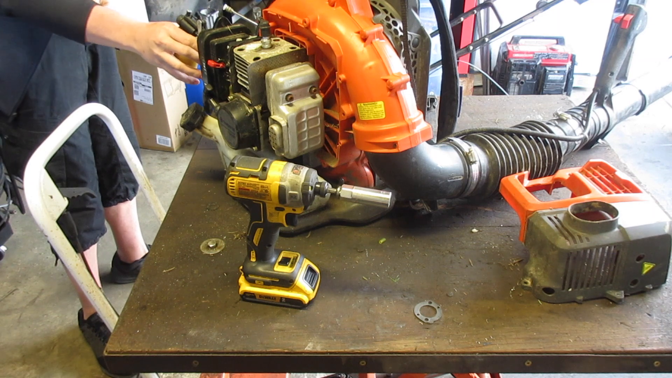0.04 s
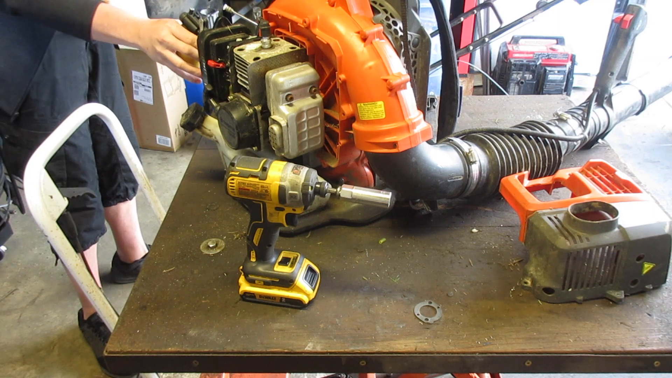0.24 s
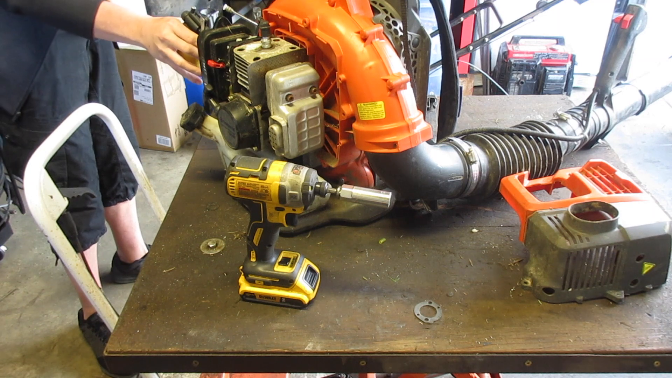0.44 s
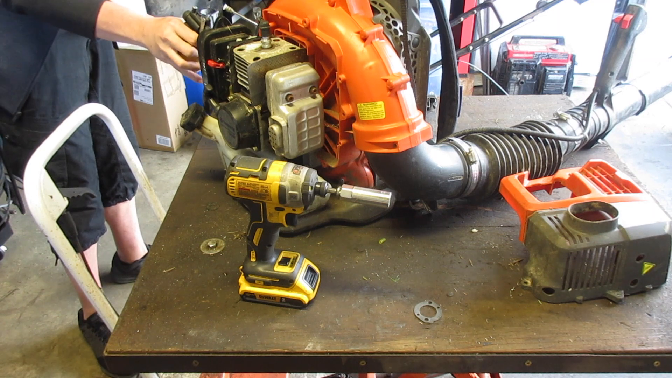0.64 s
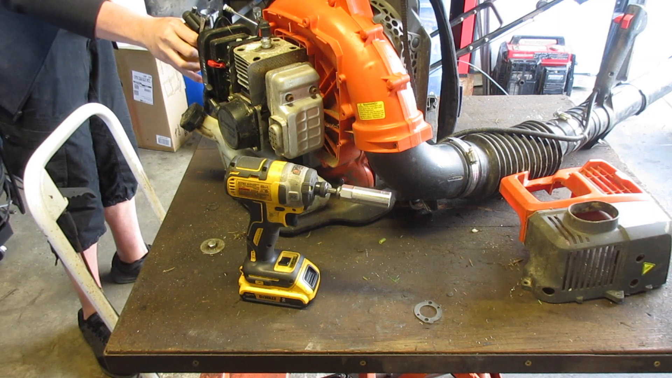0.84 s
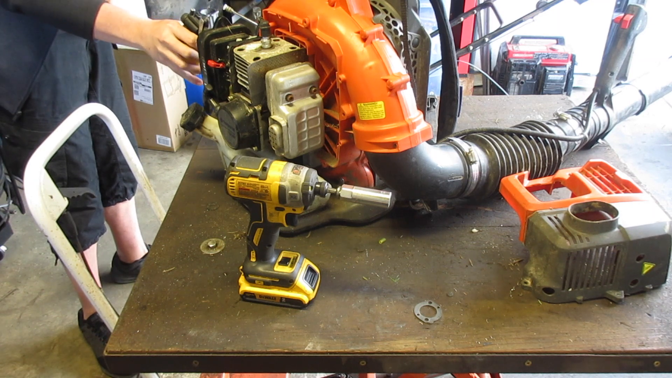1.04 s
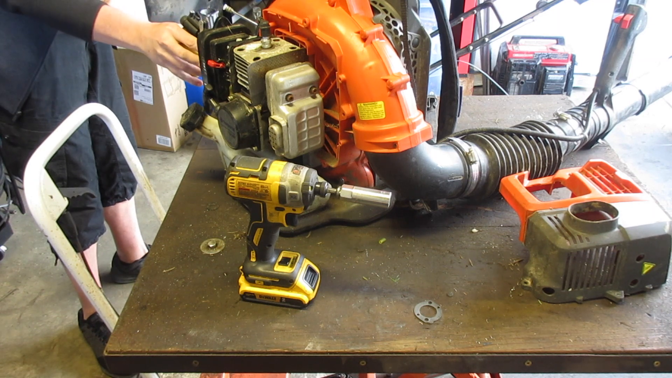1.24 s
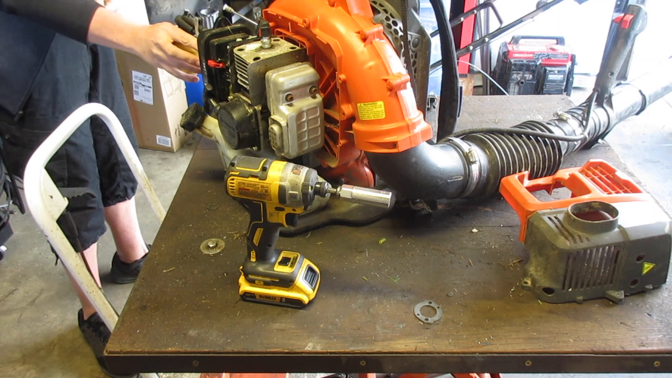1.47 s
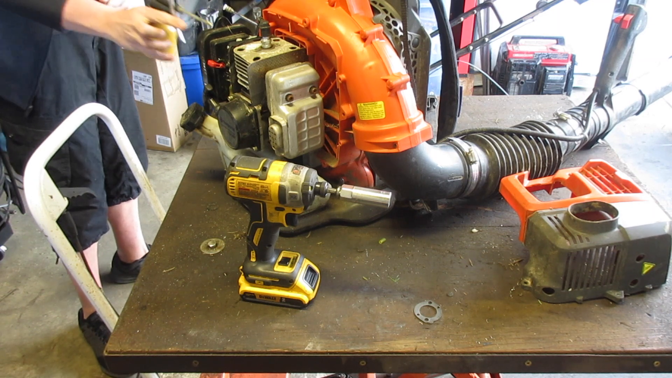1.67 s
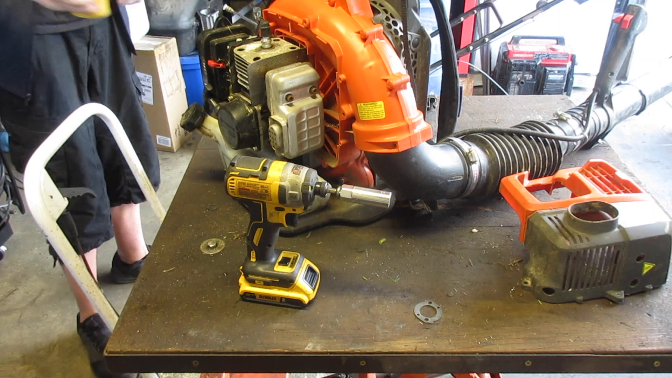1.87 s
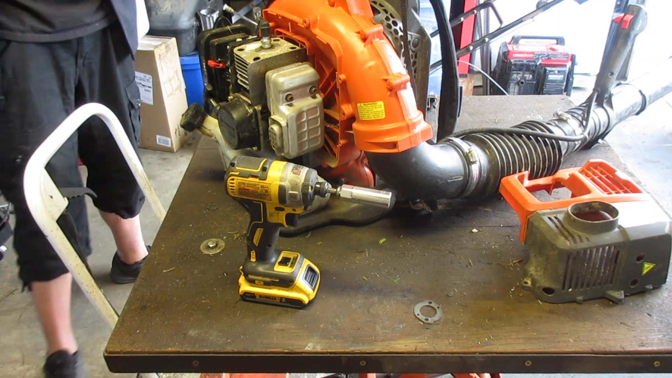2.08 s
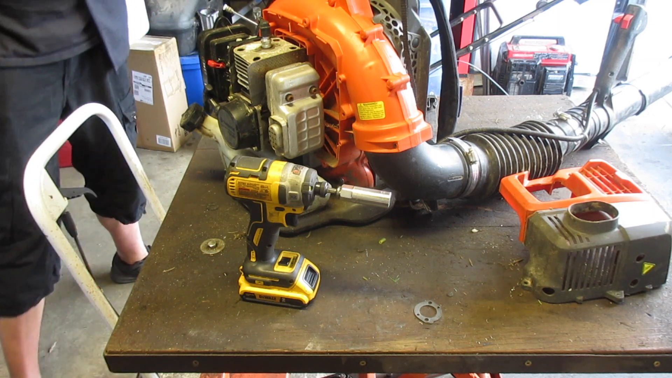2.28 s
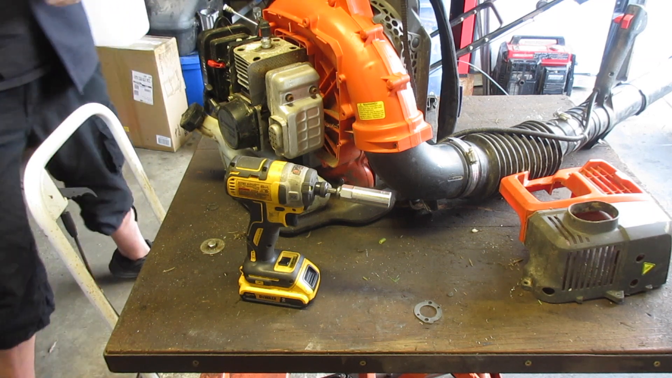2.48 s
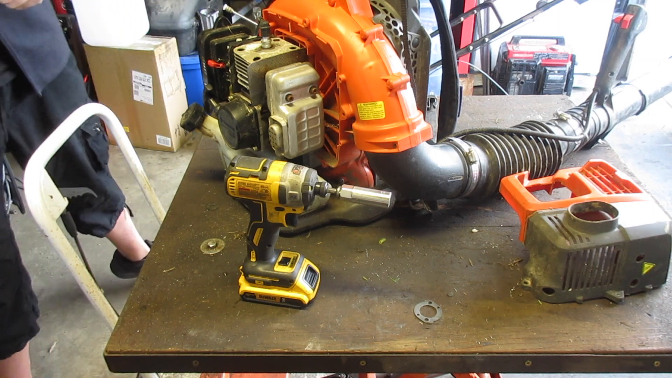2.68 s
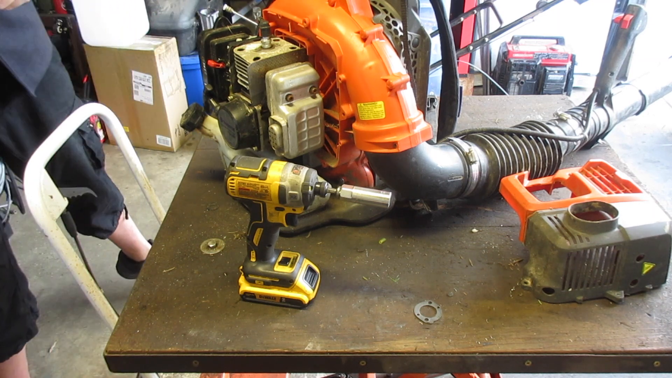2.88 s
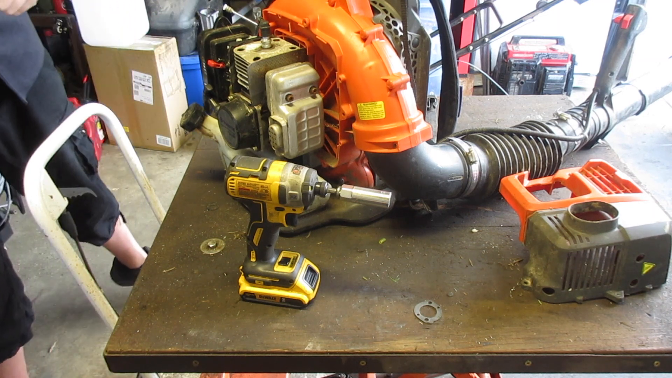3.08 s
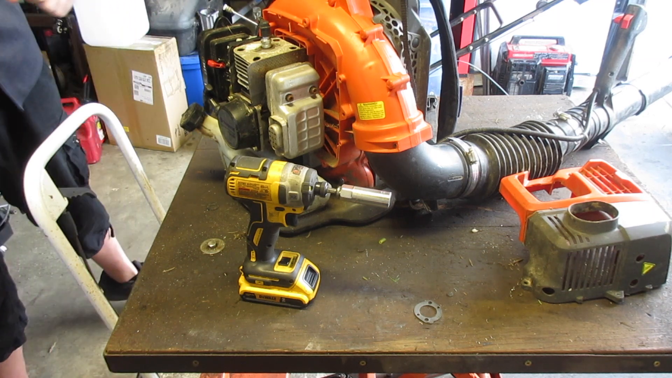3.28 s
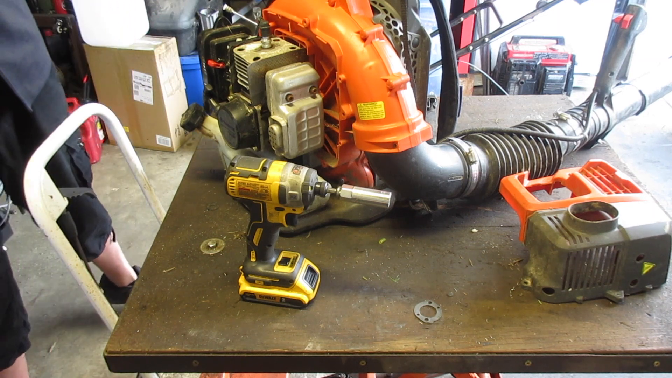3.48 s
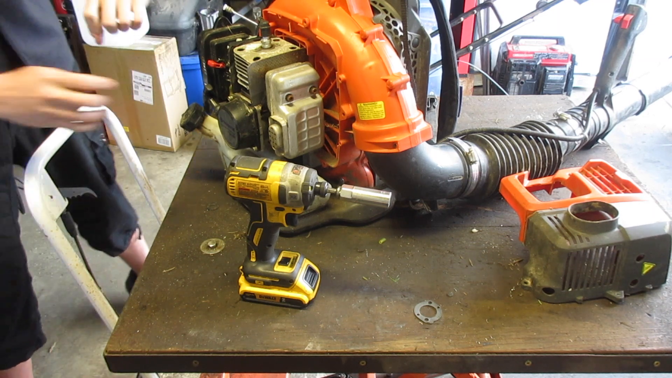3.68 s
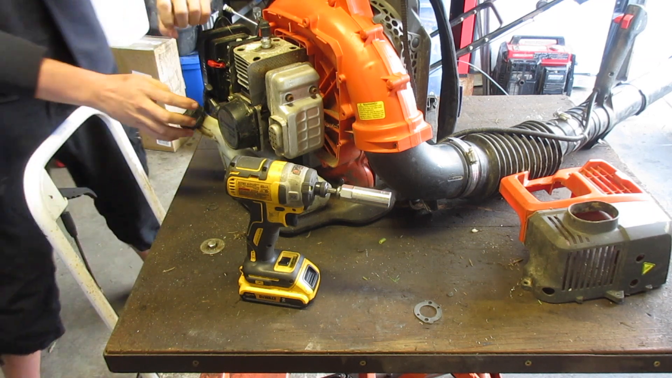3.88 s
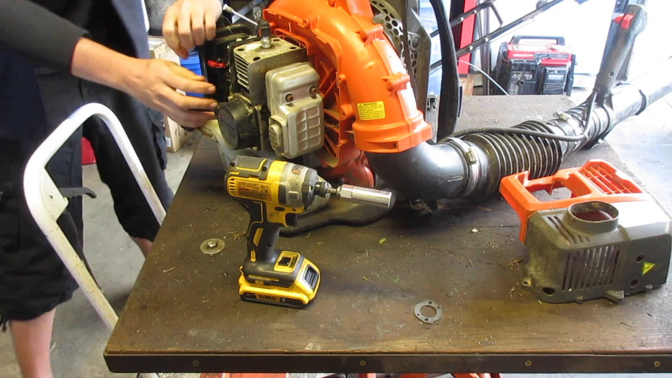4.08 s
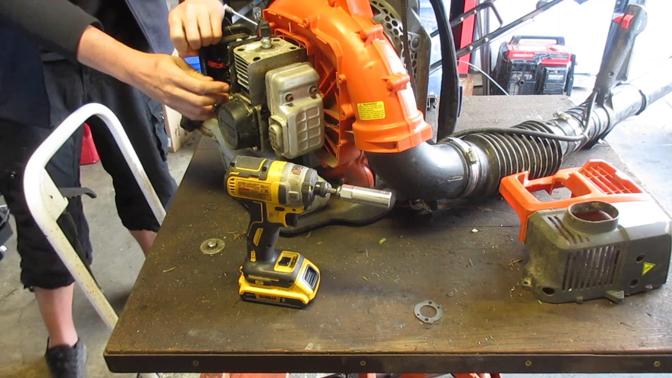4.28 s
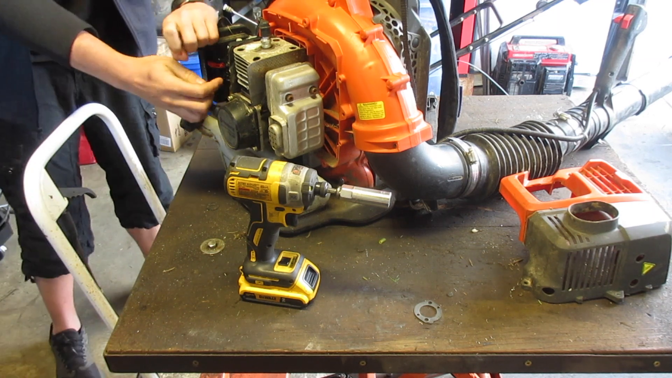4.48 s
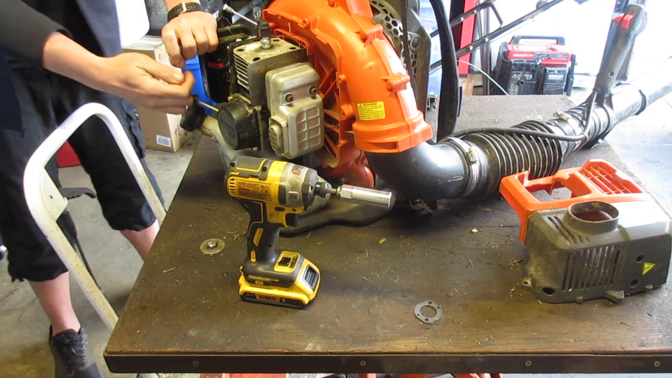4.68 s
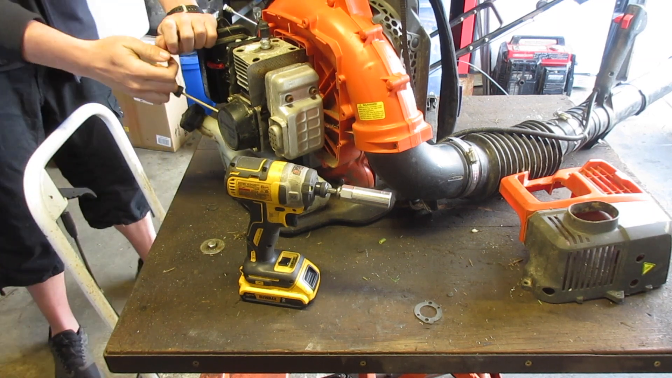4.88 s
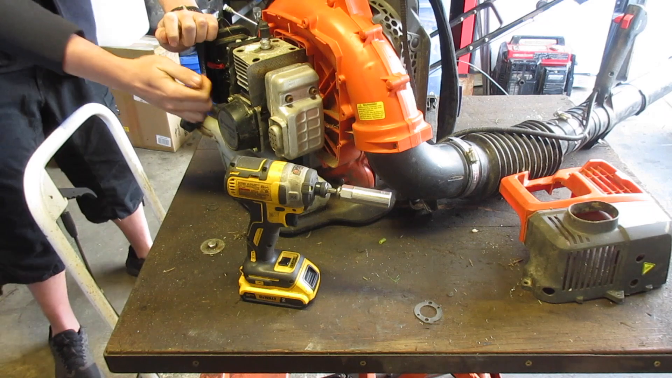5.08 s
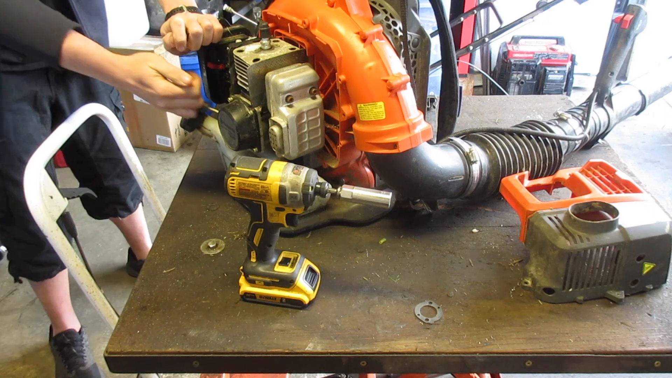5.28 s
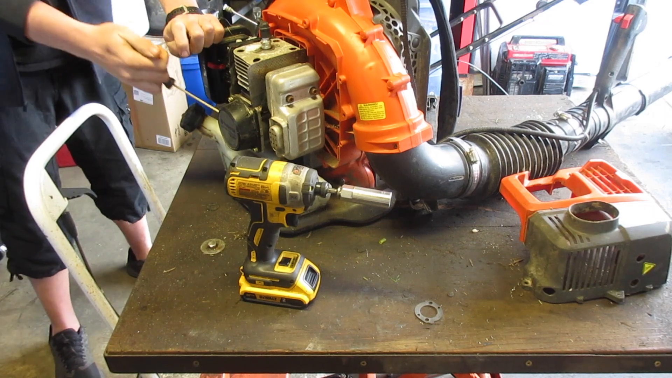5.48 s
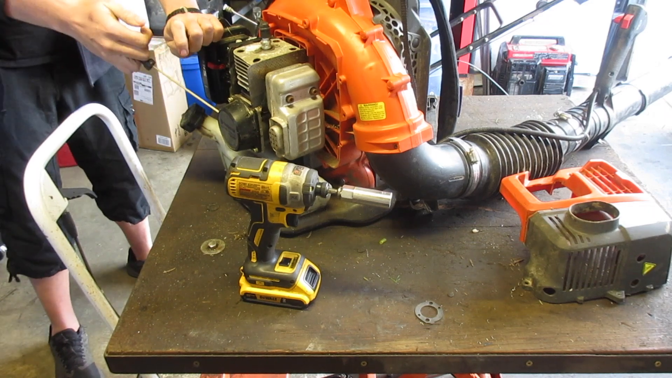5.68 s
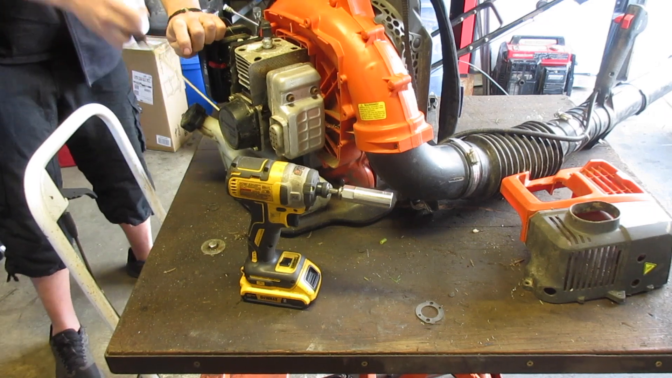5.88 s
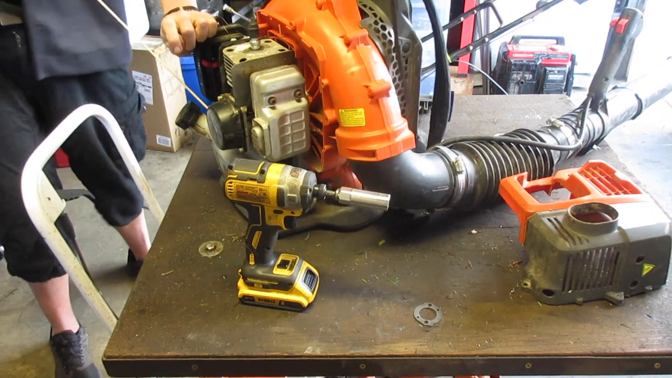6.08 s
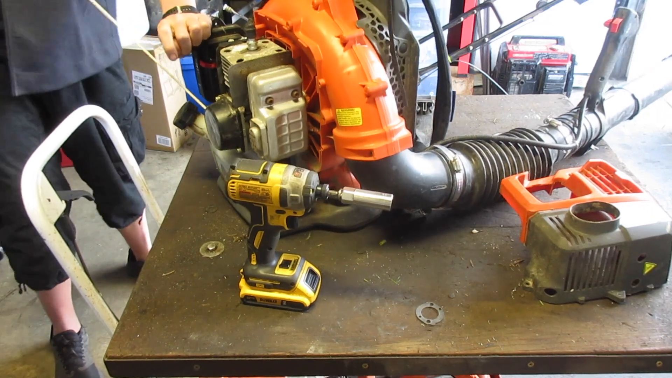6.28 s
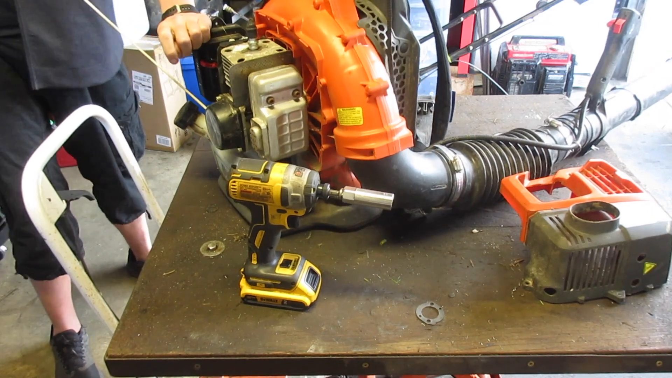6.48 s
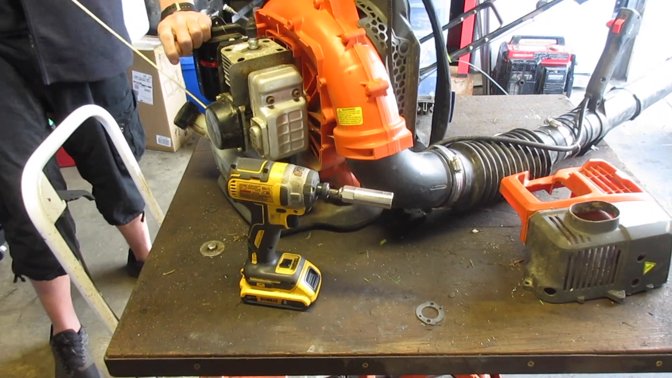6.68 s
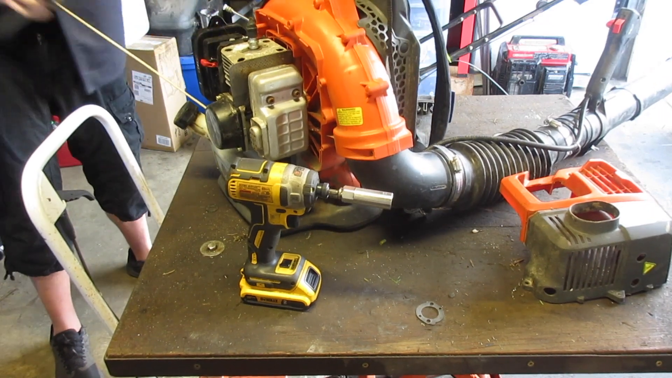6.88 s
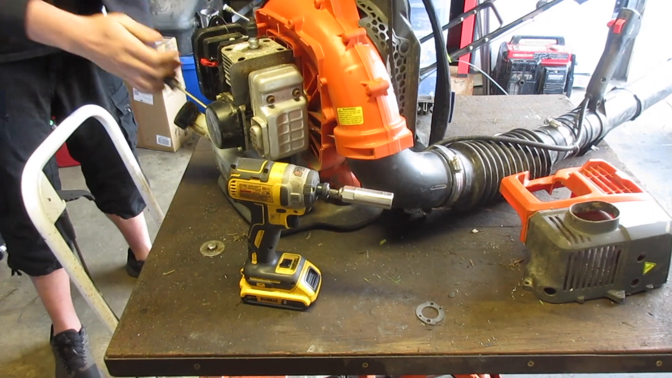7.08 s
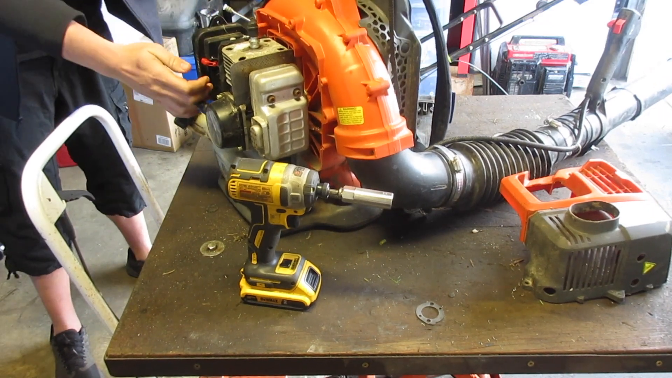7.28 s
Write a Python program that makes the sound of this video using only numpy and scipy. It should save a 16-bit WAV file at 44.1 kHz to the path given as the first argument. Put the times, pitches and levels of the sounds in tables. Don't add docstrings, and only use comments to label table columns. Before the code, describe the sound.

In a workshop, a faint low motor drone lies under everything. A short spitting puff of air comes first, then sparse light taps and a heavy dull thud on the floor. Cord and cloth rub, plastic knocks and a pulley grumbles. Finally a small two-stroke engine spins up in a loud, rattling burst with metallic clacks and low muffler thumps, then runs down. Close microphone, short room echo.

```python
import sys
import numpy as np
from scipy import signal
from scipy.fft import rfft, irfft, next_fast_len
from scipy.io import wavfile
from scipy.ndimage import uniform_filter1d

SR = 44100
rng = np.random.default_rng(int(sys.argv[2]) if len(sys.argv) > 2 else 0)


def unload_wav(signal):
    wavfile.write(
        sys.argv[1],
        SR,
        np.round(np.clip(np.atleast_2d(signal).T, -1, 1) * 32767).astype(np.int16),
    )


def to_linear_factor(level_db):
    exponent = np.asarray(level_db, float) / 20
    return 10 ** exponent


N = 323694
TIME_S = np.arange(N) / SR

# (frequency [Hz], width [Hz], level [dB])
EXHAUST_MODES = [(70, 19, -21), (105, 25, -17.5), (170, 22, -6.5), (255, 55, -4.5), (318, 44, -4.5),
                 (425, 47, -2), (570, 70, -2.5), (638, 82, -1)]


def rms_one(x):
    return x / np.sqrt(np.mean(x ** 2) + 1e-20)


def drift(rate):
    knots = rng.standard_normal(int(N / SR * 60) + 2)
    return np.interp(TIME_S * min(rate, 59), np.arange(len(knots)), knots)


def coloured(points):
    size = next_fast_len(N)
    hz = np.arange(size // 2 + 1) * SR / size + 1
    point_hz, point_db = np.transpose(points)
    shape_db = np.interp(np.log(hz), np.log(point_hz), point_db, left=-90, right=-90)
    spectrum = rfft(rng.standard_normal(size)) * to_linear_factor(shape_db)
    return rms_one(irfft(spectrum, size)[:N])


def band(low_hz, high_hz):
    sos = signal.butter(4, [low_hz, high_hz], "band", fs=SR, output="sos")
    return rms_one(signal.sosfilt(sos, rng.standard_normal(N)))


def resonances(x, modes):
    out = np.zeros(N)
    for k, (hz, width_hz, level_db) in enumerate(modes):
        r = np.exp(-np.pi * width_hz / SR)
        feed = np.array([1, 0, -1]) * (1 - r * r) / 2
        feedback = [1, -2 * r * np.cos(2 * np.pi * hz / SR), r * r]
        out += (-1) ** k * to_linear_factor(level_db) * signal.lfilter(feed, feedback, x)
    return out


def clicks(times, db):
    out = np.full(N, 1e-18)
    out[np.round(np.asarray(times) * SR).astype(int)] = to_linear_factor(db)
    return out


def dying(x, t60):
    return signal.lfilter([1], [1, -to_linear_factor(-60 / (t60 * SR))], x)


def ring(x, hz, t60):
    r = to_linear_factor(-60 / (t60 * SR))
    w = 2 * np.pi * hz / SR
    return signal.lfilter([0, np.sin(w)], [1, -2 * r * np.cos(w), r * r], x)


def struck(x, hz, t60, rise_s):
    pushed = ring(x, hz, rise_s)
    return ring(pushed, hz, t60) * 2 * (1 - to_linear_factor(-60 / (rise_s * SR)))


def swell(t, peak_s, rise_s, fall_s):
    return np.exp(-2 * ((t - peak_s) / np.where(t < peak_s, rise_s, fall_s)) ** 2)


def engine_work():
    # (time [s], level [dB])
    work = [
        (5.88, -63),
        (5.932, -32.5),
        (5.984, -25),
        (6.04, -20.5),
        (6.85, -19),
        (7.07, -23),
        (7.27, -25),
        (7.34, -29),
    ]
    s, db = np.transpose(work)
    return np.interp(TIME_S, s, db, left=-120)


def speed_lost():
    from_top_s = TIME_S - 6.42
    return np.where(from_top_s < 0, 20, 12.6) * from_top_s ** 2


def revolutions():
    top_speed_hz, tick_at_s = 23.4, 6.378
    turn = np.cumsum(np.maximum(top_speed_hz - speed_lost(), 0)) / SR
    return turn - turn[round(tick_at_s * SR)]


def engine():
    # (frequency [Hz], width [Hz], level [dB])
    casing_modes = [(1248, 75, 2.5), (1740, 540, 5.5), (2372, 56, 11), (3078, 54, 6.5), (3310, 80, 2),
                    (3585, 66, 2.5), (4147, 106, 4), (4464, 85, 4), (4880, 62, -1), (7150, 71, -19),
                    (7400, 77, -18), (9200, 74, -9)]
    # (frequency [Hz], level [dB per Hz])
    rattle_colour = [(410, -33), (700, -3), (1140, -5), (2330, -19), (2540, -5), (3180, -7), (5600, -15.5),
                     (7280, -37), (12300, -120)]
    # (frequency [Hz], level [dB per Hz])
    hiss_colour = [(2940, -37), (5000, -3.5), (6470, -5.5), (7280, -8), (10700, -9.5), (11700, -11.5),
                   (14500, -17.5), (15300, -1)]
    full_work_db = -20
    swing_db = engine_work() - full_work_db
    roar_db = full_work_db - 4 + swing_db
    rattle_db = full_work_db - 0.5 + 1.1 * swing_db
    hiss_db = full_work_db - 13.5 + 0.93 * swing_db
    turn = revolutions()

    def beat(per_turn, lag, sharpness):
        return np.exp(-sharpness * ((per_turn * turn - lag) % 1))

    stroke = np.floor(2 * turn).astype(int) % 200
    uneven = to_linear_factor(1.12 * rng.standard_normal(200))[stroke]

    roar = rms_one(resonances(rng.standard_normal(N), EXHAUST_MODES))
    roar *= 0.77 + 1.12 * beat(1, .35, 2.4)

    knocking = (rng.random(N) < 900 / SR) * rng.standard_normal(N) * 2.8
    knocking += 0.32 * rng.standard_normal(N)
    casing = rms_one(resonances(knocking, casing_modes))
    rattle = 0.64 * coloured(rattle_colour) + 0.72 * casing
    rattle *= (0.74 + 0.69 * beat(1.8, 0.046, 2.1)) * uneven

    ticks = rms_one(resonances(rng.standard_normal(N), [(6560, 1300, -2), (7440, 940, 0)]))
    ticks *= 1.53 * beat(0.99, 0, 2.55) * uneven
    hiss = coloured(hiss_colour) * (0.67 + 0.98 * beat(2.5, 0.1, 2.9)) + ticks
    return to_linear_factor(roar_db) * roar + to_linear_factor(rattle_db) * rattle + to_linear_factor(hiss_db) * hiss


def exhaust_note():
    # (multiple of the revolution, level [dB])
    orders = [(3, -9.5), (4, -20), (5, -4.5), (7, -1.5), (9, -7.5), (10, -1.5), (11, -2), (16, -3),
              (18, 0.5), (20, -5.5), (24, 0.5), (25, -5), (27, -5.5), (29, 2)]
    turn = revolutions()
    tones = np.zeros(N)
    for k, db in orders:
        level = to_linear_factor(db + (1 + k / 12) * drift(12))
        tones += level * np.sin(2 * np.pi * (k * turn + rng.random()) + k / 40 * drift(12))

    firing = (np.diff(np.floor(turn - .3), prepend=0) > 0) * to_linear_factor(2.1 * drift(25))
    firing[0] = 1e-18
    pops = rms_one(resonances(firing, EXHAUST_MODES)[round(6 * SR):])
    pops = np.pad(pops, (N - len(pops), 0))

    clean_db = -1.5 - 9.5 * (1 - np.exp(-speed_lost() / 2.7))
    return to_linear_factor(engine_work() + clean_db) * (0.85 * rms_one(tones) + 0.37 * pops)


def clacks():
    # (time [s], ring level [dB], casing level [dB])
    hits = [(5.9302, -32, -19.5), (5.9549, -29, -15.5), (6.0277, -9.5, -13.5), (6.0802, -14, -11.5),
            (6.159, -18.5, -15.5), (6.1734, -16, -11), (6.2228, -19.5, -13.5), (6.641, -24, -17),
            (6.8235, -21, -27), (6.87, -16, -16), (6.886, -19, -36), (6.9842, -9.5, -13),
            (7.0265, -24, -18), (7.1043, -11, -13), (7.184, -36, -21.5), (7.229, -29, -18),
            (7.248, -11.5, -14)]
    # (frequency [Hz], level [dB], t60 [s])
    modes = [(7210, 3, 0.029), (7500, -7, 0.023), (7800, -12, .02), (6040, -2, 0.024), (10950, -8, 0.023),
             (11500, 0, 0.014), (9050, -4, .015)]
    s, ring_db, casing_db = np.transpose(hits)
    top_db = 1.33 * ring_db - 7.5
    spread_db = rng.normal(0, 3.8, (len(s), len(modes)))
    out = np.zeros(N)
    for k, (hz, db, t60) in enumerate(modes):
        force_db = top_db + 11 if hz > 8500 else ring_db - 1.5
        hit = clicks(s, force_db + db - 6 + spread_db[:, k])
        out += (-1) ** k * struck(hit, hz, t60, rise_s=0.015)

    bright = dying(clicks(s + 0.0012, ring_db - 8.5), 0.068)
    out += uniform_filter1d(bright, size=66) * band(4800, 8000)
    brightest = dying(clicks(s + 0.00059, top_db + 0.5), 0.063)
    out += uniform_filter1d(brightest, size=66) * band(8400, 13300)
    casing = signal.lfilter([.012], [1, -.988], dying(clicks(s, casing_db - 2), 0.057))
    return out + casing * band(870, 3740)


def thumps():
    # (time [s], level [dB], pitch [Hz])
    pushes = [(5.968, -13, 243), (6.030, -10, 200), (6.082, -12, 213), (6.126, -12.5, 272),
              (6.172, -15, 245), (6.206, -25, 243), (6.887, -11, 226), (6.988, -12, 215),
              (7.112, -14.5, 190), (7.182, -14.5, 314), (7.228, -22, 169), (7.264, -14.5, 262)]
    out = np.zeros(N)
    for s, db, hz in pushes:
        age = np.maximum(TIME_S - s, 0)
        envelope = age / 0.0092 * np.exp(1 - age / 0.005)
        cycles = np.sin(2 * np.pi * hz * age) + .5 * np.sin(2 * np.pi * 0.63 * hz * age)
        out += to_linear_factor(db) * envelope * cycles
    return out


def knocks():
    # (time [s], ring against crack [dB], body [dB], shell [dB], edge [dB])
    hits = [(1.536, -8, -62, -34.5, -49), (1.839, -8, -64, -51.5, -57), (2.309, 2, -49, -62, -65),
            (3.338, -10, -55, -54, -60), (4.14, -10, -52, -56, -58), (4.678, -17, -40.5, -39.5, -41.5),
            (4.71, -5, -41, -53, -58), (4.742, 2, -41, -35, -44), (4.992, 0, -38.5, -57, -55),
            (5.082, -17, -28.5, -37.5, -39.5), (5.136, 5, -42, -54, -62), (5.346, -8, -30.5, -46, -42),
            (5.37, -4, -36, -41, -57), (5.388, -2, -31, -29, -30), (5.492, -9, -46, -48, -60),
            (5.635, -2.5, -32, -31, -61)]
    # (frequency [Hz], level [dB], t60 [s])
    modes = [(475, -6, 0.032), (616, 1.5, 0.041), (900, -9, 0.047), (1166, -9, 0.023), (1540, -14, 0.051),
             (1710, -3.5, 0.035), (2200, -0.5, 0.049), (2370, -7, 0.06), (2600, -7, 0.033),
             (4580, 3.5, 0.023), (5220, 4, 0.022), (6330, -3, 0.048), (6700, 1, 0.028), (7760, -13, .02)]
    s, ring_db, *parts_db = np.transpose(hits)
    spread_db = rng.normal(0, 1.5, (len(s), len(modes)))
    out = np.zeros(N)
    shake = rng.standard_normal(N)
    for k, (hz, db, t60) in enumerate(modes):
        part_db = parts_db[(hz > 1400) + (hz > 4200)]
        hit = clicks(s, part_db + db + ring_db - 1 + spread_db[:, k])
        chatter = 0.1 * shake * dying(hit, 0.059)
        out += (-1) ** k * struck(hit + chatter, hz, t60, rise_s=0.0029)
    for part_db, (low_hz, high_hz) in zip(parts_db, [(450, 1820), (1600, 3820), (4000, 7500)]):
        out += dying(clicks(s, part_db + 1), 0.055) * band(low_hz, high_hz)
    return out


def thud():
    # (time [s], level [dB], contact softness [Hz])
    drops = [
        (2.9651, -7.5, 1490),
        (2.9729, -11, 900),
        (3.003, -21, 550),
        (3.024, -31, 900),
        (3.116, -30, 230),
    ]
    # (frequency [Hz], level [dB], t60 [s])
    modes = [(114, -19, 0.061), (189, -3, 0.089), (218, -2.5, 0.064), (357, -7, 0.067), (408, -7.5, 0.13),
             (434, -8, 0.099), (530, -1.5, 0.035), (622, 1.5, 0.044), (685, -3.5, 0.03), (800, -4.5, 0.025),
             (934, -12, 0.063), (1010, -20, 0.11), (1163, -17, 0.032), (1950, -21, 0.026)]
    spread_db = rng.normal(0, 1.4, (len(drops), len(modes)))
    out = np.zeros(N)
    for (s, db, soft_hz), row in zip(drops, spread_db):
        hit = np.zeros(N)
        for k, (hz, level_db, t60) in enumerate(modes):
            hit += (-1) ** k * struck(clicks([s], db + level_db + row[k]), hz, t60, rise_s=0.007)
        out += signal.sosfilt(signal.butter(2, soft_hz, fs=SR, output="sos"), hit)
    out += dying(clicks([drops[0][0]], -37.5), 0.054) * band(1200, 2140)
    return out + dying(clicks([drops[1][0]], -50), 0.11) * band(2000, 4200)


def rubs():
    # (peak time [s], rise [s], fall [s], level [dB], lowest frequency [Hz])
    strokes = [(1.55, .01, 0.046, -41.5, 3500), (5.645, 0.0066, 0.074, -57, 900),
               (2.27, 0.033, 0.089, -57, 3500), (3.345, .01, .05, -51, 2500),
               (3.865, 0.021, 0.041, -45, 4020), (4.065, 0.046, 0.039, -43.5, 2200),
               (4.385, 0.028, 0.054, -40, 1690), (4.43, 0.039, 0.042, -34.5, 1630),
               (4.6, 0.045, .02, -48.5, 3000), (4.85, 0.051, .05, -37.5, 1480),
               (5.025, 0.035, 0.084, -39.5, 1840), (5.29, 0.054, 0.054, -52, 1950),
               (5.9, 0.046, 0.034, -51, 800)]
    # (frequency [Hz], level [dB per Hz])
    colour = [(600, 12), (1700, 4), (2500, 4), (3300, 0.5), (4200, 0.5), (6300, -4.5), (9000, -11.5),
              (12000, -18.5), (15500, -24)]
    cloth = coloured(colour) * to_linear_factor(3.9 * drift(50))
    out = np.zeros(N)
    for s, rise, fall, db, low_hz in strokes:
        near = slice(int((s - .2) * SR), int((s + .4) * SR))
        no_low = signal.butter(3, low_hz, "high", fs=SR, output="sos")
        out[near] += to_linear_factor(db) * swell(TIME_S[near], s, rise, fall) * signal.sosfilt(no_low, cloth[near])
    return out


def pulley():
    # (peak time [s], rise [s], fall [s], level [dB])
    turns = [
        (4.71, .04, .06, -49.5),
        (4.97, 0.022, 0.029, -42),
        (5.025, 0.024, .02, -35.5),
        (5.15, 0.032, .015, -45),
        (5.35, .01, .07, -36.5),
        (5.505, 0.043, 0.038, -42),
    ]
    # (frequency [Hz], width [Hz], level [dB])
    modes = [(614, 67, 1), (970, 31, -12), (1180, 46, -8), (1620, 69, -22.5)]
    bumps = (rng.random(N) < 600 / SR) * rng.standard_normal(N)
    level = sum(to_linear_factor(db) * swell(TIME_S, s, rise, fall) for s, rise, fall, db in turns)
    return level * rms_one(resonances(bumps, modes))


def puff():
    # (frequency [Hz], level [dB per Hz])
    colour = [(180, -41), (300, -14), (390, -8), (819, -15), (1050, -12), (1300, -14), (2680, -4),
              (6200, -4), (7190, -7), (12400, -20), (15300, -21)]
    peak_s, rise_s, t60_s = .596, 0.013, 0.16
    fall = to_linear_factor(-60 * np.abs(TIME_S - peak_s) / t60_s)
    blast = np.where(TIME_S < peak_s, swell(TIME_S, peak_s, rise_s, 1), fall)
    spit = dying((rng.random(N) < 1200 / SR) * rng.exponential(1, N), 0.0033)
    return to_linear_factor(-25 + drift(53.5)) * blast * rms_one(1 + 1.3 * spit) * coloured(colour)


def blips():
    # (time [s], level [dB], pitch [Hz], t60 [s])
    touches = [(0.593, -33, 393, 0.11), (.587, -35, 11000, .012), (.598, -45, 12000, 0.25),
               (1.536, -35, 2500, 0.033), (2.31, -46, 187, .12), (4.5, -46, 450, 0.073),
               (3.7, -52, 1900, 0.11), (4.745, -35, 1900, .08), (4.746, -41, 2370, .12), (7, -47, 2240, .2),
               (1.7, -44, 2400, 0.023), (5.272, -52, 3200, .03)]
    return sum(struck(clicks([s], db), hz, t60, rise_s=0.014) for s, db, hz, t60 in touches)


def shop(x):
    t60_s, level_db = 0.33, -9.5
    t = np.arange(SR // 2) / SR
    tail = rng.standard_normal(len(t)) * to_linear_factor(-60 * t / t60_s) * (t > .006)
    tail = signal.lfilter([1], [1, -.45], tail)
    tail /= np.sqrt(np.sum(tail ** 2))
    return to_linear_factor(level_db) * signal.fftconvolve(x, tail)[:N]


def drone():
    # (multiple of its speed, level [dB rms])
    orders = [(2, -54.5), (3, -67), (4, -53.5), (5, -67.5), (6, -68.5), (8, -60), (10, -61.5), (12, -71),
              (16, -52.5), (17, -59), (19, -62), (20, -62.5), (21, -63.5), (24, -73), (25, -65.5),
              (48, -68)]
    # (frequency [Hz], level [dB per Hz])
    air_colour = [(20, -16), (60, -10), (125, -18), (200, -20.5), (235, -10), (270, -16.5), (325, -11),
                  (350, -15.5), (400, -15.5), (740, -17), (2130, -23), (3720, -31), (8090, -36),
                  (15500, -46)]
    motor_hz = 15.32
    hum = np.zeros(N)
    for k, db in orders:
        level = np.sqrt(2) * to_linear_factor(db + 0.83 * drift(2.9))
        hum += level * np.sin(2 * np.pi * (k * motor_hz * TIME_S + rng.random()))
    return hum + to_linear_factor(-49.5 + .5 * drift(5.03)) * coloured(air_colour)


def scene():
    no_bass = signal.butter(3, 80, "high", fs=SR, output="sos")
    handling = rubs() + pulley() + puff()
    blows = signal.sosfilt(no_bass, clacks() + thumps() + knocks() + blips() + handling)
    drop = signal.sosfilt(no_bass, thud())
    running = signal.sosfilt(no_bass, engine())
    echoes = shop(blows + 0.64 * drop + 0.54 * running)
    mix = blows + drop + running + echoes + exhaust_note() + drone()
    return mix[None]


def top_cut(x):
    return signal.sosfilt(signal.butter(12, 15480, fs=SR, output="sos"), x)


def record(dry):
    low_pass = signal.cheby2(12, 70, 15800, fs=SR, output="sos")
    finished = signal.sosfilt(low_pass, dry)
    return top_cut(finished)


dry = scene()
out = record(dry)
unload_wav(out)
```